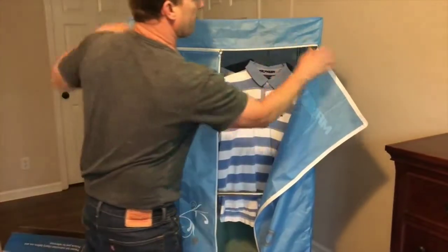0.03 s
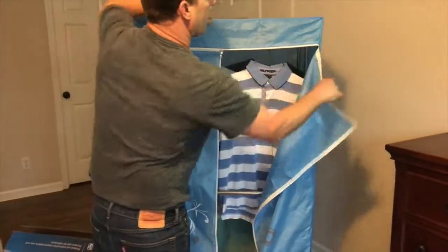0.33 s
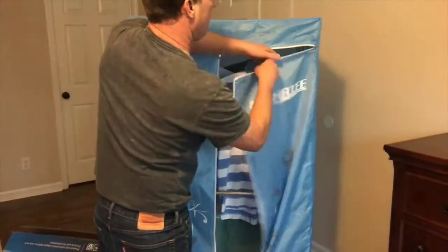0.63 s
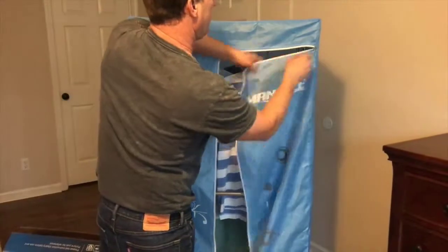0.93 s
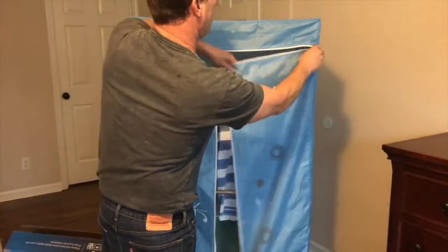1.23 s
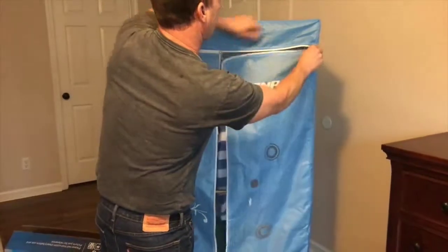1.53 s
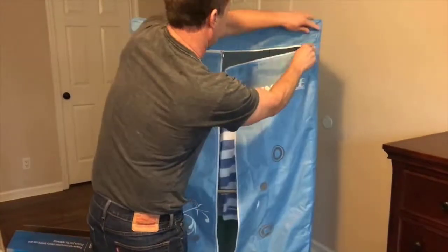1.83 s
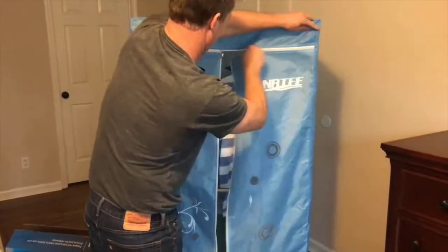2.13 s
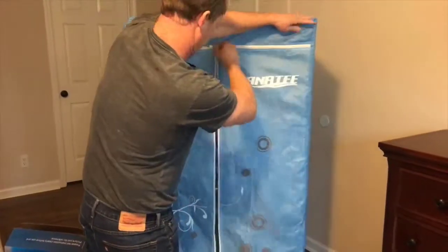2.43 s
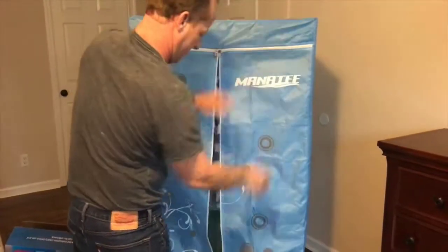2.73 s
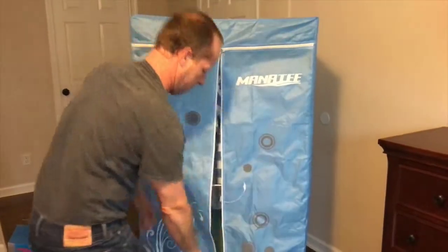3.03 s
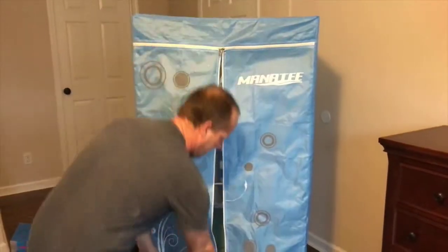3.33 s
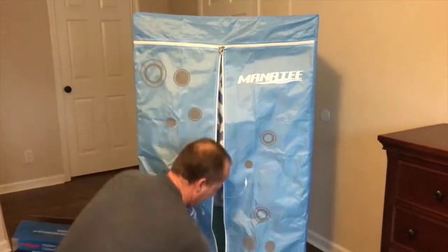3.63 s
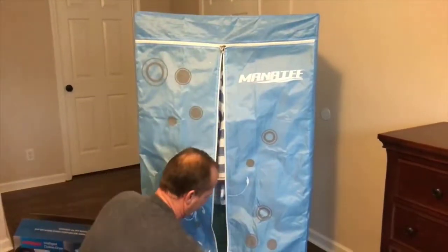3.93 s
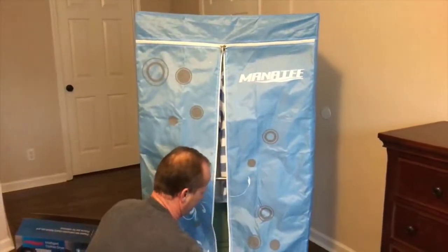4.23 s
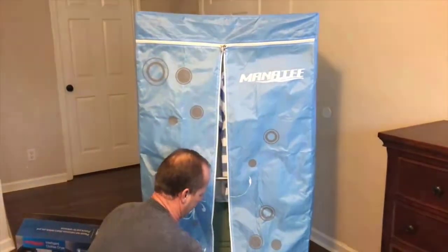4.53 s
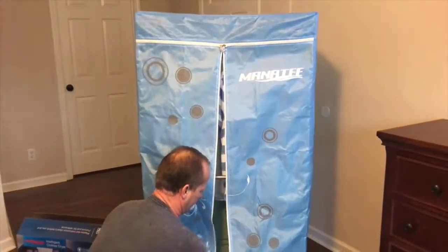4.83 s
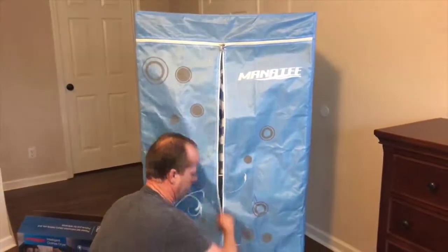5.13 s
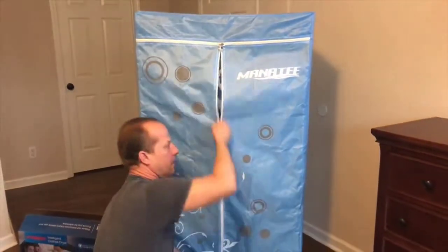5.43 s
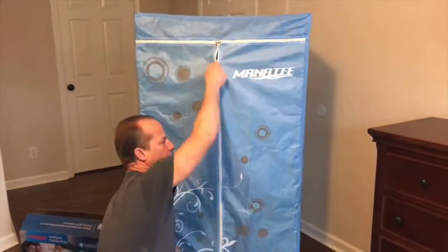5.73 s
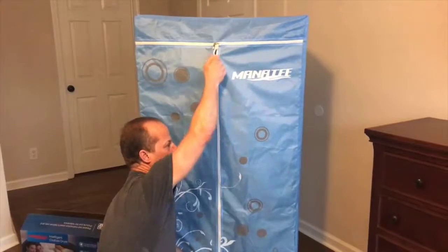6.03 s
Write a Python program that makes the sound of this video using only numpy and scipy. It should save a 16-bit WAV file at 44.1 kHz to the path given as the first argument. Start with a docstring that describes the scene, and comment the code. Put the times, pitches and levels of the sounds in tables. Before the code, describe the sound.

From the start, a nylon wardrobe cover crumples and swishes as its flap is swung over, with several crisp snaps, the strongest at about 1.1 seconds. From 1.8 to 2.7 seconds a zipper closes with a rasping buzz that rises in pitch, then slows. Its metal tab jingles and clinks lightly between 2.5 and 3 seconds. Two dull footfalls thud on the floor at about 2.8 and 3.4 seconds. Faint rustling and small fabric crackles continue until 4.8 seconds. From 4.9 to 6 seconds a second zipper is pulled in one long stroke, faster and higher, pressing harder near 5.7 seconds before dropping in pitch and stopping. Quiet room air and a faint low rumble of movement lie underneath. The place is a small bedroom, heard in mono from far enough away that the zips and cloth carry a short room reverberation.

```python
"""A small bedroom, one mono microphone, far enough off that zips and cloth are about half wall sound.
A man swings over the flap of a nylon wardrobe cover, which crumples, swishes and snaps. He zips the top
edge: the slider ticks over the teeth and the taut cloth radiates the buzz. The metal pull tab clinks,
and he steps back with two dull footfalls that ring the floor. He feels for the lower slider and pulls
it up in one long stroke. Room air lies under it all, with a low rumble as man and frame sway."""
import sys
import numpy as np
from scipy import signal
from scipy.fft import rfft, irfft
from scipy.io import wavfile

SR = 44100
rng = np.random.default_rng(int(sys.argv[2]) if len(sys.argv) > 2 else 0)


def file_out(sig):
    """Save sig as 16-bit WAV at sys.argv[1]."""
    # one column per channel
    cols = np.atleast_2d(sig).T
    # limit, then scale
    lim = np.clip(cols, -1, 1)
    pcm = np.round(lim * 32767).astype(np.int16)
    wavfile.write(sys.argv[1], SR, pcm)


N = 268613
TIME = np.arange(N) / SR

# The pull along each seam. Each row: time in seconds, teeth per second, relative force in dB.
TOP_STROKE = [(1.81, 91.4, -51), (1.95, 219.5, -45), (2.02, 340, -44), (2.08, 492.1, -43.5),
              (2.2, 585, -43), (2.27, 568.5, -42.5), (2.35, 594, -47.5), (2.39, 354.4, -37.5),
              (2.44, 379.5, -49.5), (2.5, 269.6, -50), (2.68, 90.05, -48.5)]
FRONT_STROKE = [(4.88, 199.8, -47.5), (4.935, 331.4, -45.5), (4.968, 600, -44.5), (5.0, 635, -46),
                (5.08, 600, -44.5), (5.21, 914.4, -42.5), (5.3, 987.8, -44), (5.4, 990.6, -43.5),
                (5.5, 841.5, -42), (5.58, 870.6, -42), (5.635, 836.7, -46.5), (5.67, 772.2, -39.5),
                (5.73, 600, -37), (5.8, 344.3, -38), (5.86, 250.6, -40), (6.06, 89.64, -43)]
# The partials of each seam's whine. Each row: multiple of the tooth rate, relative level in dB.
TOP_PARTIALS = [(1, -2), (2, -7), (3, -14.5), (4, -14.5), (6, -14.5)]
FRONT_PARTIALS = [(1, -4.5), (1.5, -20.5), (2, -6.5), (3, -8.5), (4, -13), (6, -18)]
# How readily the taut cloth along each seam sings. Each row: frequency in Hz, gain in dB.
TOP_SINGING = [(150, -23), (250, -13), (350, -4), (490, -4.5), (600, -0.5), (690, -0.5), (850, -4),
               (1170, 2.5), (1700, 2), (2300, 4), (6000, -3)]
FRONT_SINGING = [(130, -23), (215, -10), (330, -1.5), (450, -6), (560, -4.5), (660, -0.5), (780, -3),
                 (880, 1.5), (1000, -3), (1230, 7), (1500, 0.5), (2000, -2.5), (3000, -4), (6000, -6.5)]
# The knocked cloth panel and the scraping slider. Each row: frequency in Hz, relative level in dB.
PANEL_SPECTRUM = [(60, -40), (170, -8), (300, 1.5), (450, -8.5), (800, -1), (1200, 1.5), (1900, -2),
                  (3000, -8.5), (4500, -10.5), (7000, -32), (15000, -29)]
SCRAPE_SPECTRUM = [(500, -38.5), (2000, 11), (4200, 4.5), (6400, 2), (7600, -3.5), (9300, -3.5),
                   (10400, -9), (11500, -6.5), (15500, -7)]
# Hands on the cover: swinging the flap, drawing it along the top, letting go, straightening the seam.
# Each row: start, length and swell in seconds, then relative crumple and swish levels in dB.
CLOTH_MOVES = [(0.0, 0.11, .01, -67, -75.5), (0.231, 0.57, 0.008, -54, -63), (0.331, 0.03, 0.012, -45, -73),
               (0.517, 0.023, .005, -51.5, -79), (0.713, 0.063, 0.061, -54.5, -77),
               (0.878, 0.1, .03, -60.5, -61.5), (1.035, 0.14, 0.04, -53.5, -50.5),
               (1.243, 0.035, .02, -52.5, -68), (1.373, .04, .01, -59.5, -70),
               (1.442, 0.081, .005, -58, -76), (2.718, 1.1, .03, -73, -72), (3.007, 0.034, .005, -67, -67),
               (3.808, 1.01, 0.011, -67, -72), (4.2, 0.33, 0.048, -72, -68)]
# Nylon buckling and nylon sliding. Each row: frequency in Hz, relative level in dB.
CRUMPLE_SPECTRUM = [(60, -42.5), (200, -4.5), (500, -7.5), (900, -2.5), (1500, -1), (2600, -3.5),
                    (4200, -10.5), (7000, -21.5), (15000, -34.5)]
SWISH_SPECTRUM = [(600, -8.5), (2500, 4), (4200, 3.5), (6400, 2), (7600, -2.5), (9300, -1), (10400, -5.5),
                  (11500, -0.5), (15500, -6)]
# Folds snapping over; the row at 3.015 s is the low body of the pull tab's tick. Each row: start in seconds,
# peak at the cloth in dB, bass and treble trims in dB.
FOLD_SNAPS = [(0.196, -47, -12, -17), (0.237, -41.5, -33, -21), (0.509, -34.5, -30, -24),
              (0.739, -36, -14, -1.5), (0.789, -40, -12, -9), (1.142, -28, -14, -15),
              (1.448, -36, -43, -10), (1.78, -57, -13, -18), (1.809, -42, -4.5, -3), (3.015, -42, -25, -11),
              (3.82, -47.5, -23, -23), (3.899, -43, -14, -17), (4.047, -45, -38, -2), (4.092, -50, -3, -9),
              (4.306, -44, -18, -15), (4.449, -43, -13, -7.5), (4.63, -44, -12, -8)]
# The pull tab striking the slider. Each row: start in seconds, peak in dB, 60 dB decay time in seconds.
TAB_CLINKS = [(2.608, -36, 0.033), (2.617, -38, 0.03), (2.752, -52, 0.03), (2.894, -49, 0.015),
              (2.9495, -48, .006), (3.017, -34.5, 0.0032)]
# The tab ringing as it swings. Each row: start in seconds, pitch in Hz, relative level in dB.
TAB_JINGLES = [(2.46, 8350, -62), (2.54, 8350, -57), (2.599, 8350, -58), (2.73, 8500, -69),
               (2.828, 8500, -65)]
# Footfalls and lighter shifts of weight. Each row: start in seconds, relative level in dB.
STEPS = [(2.832, -30), (3.191, -54), (3.401, -27), (4.65, -55), (4.75, -56), (4.88, -45.5)]
# The floor's modes. Each row: frequency in Hz, relative level in dB, 60 dB decay time in seconds.
FLOOR_MODES = [(65, -17, 0.62), (123.7, -18.5, 0.44), (149, -7, 0.4), (184.5, -3, 0.29), (210.7, 5, .28),
               (256, -21, 0.51), (285.7, -0.5, 0.23), (311.4, 1, 0.34), (342, -12, 0.5), (410, -33, 0.17),
               (706, -14.5, 0.06), (857, -21.5, 0.16)]
# Near walls returning each thud to the microphone. Each row: delay in seconds, linear gain.
THUD_ECHOES = [(.0072, 0.36), (.0305, 0.35), (0.038, 0.28)]
# The bedroom's reverberation. Each row: frequency in Hz, 60 dB decay time in seconds.
WALLS_T60 = [(150, 0.37), (600, 0.54), (2000, 0.53), (5000, 0.58), (14000, 0.42)]
# The man and the light frame swaying. Each row: start and length in seconds, relative level in dB.
SWAYS = [(0.0, .15, -66), (0.334, 0.052, -61.5), (0.48, 0.31, -70), (1.89, 0.052, -60), (2.0, 0.31, -69.5),
         (2.377, 0.043, -55), (2.863, 0.69, -64), (4.95, 1.08, -66)]
# The rumble of that swaying, and the still room. Each row: frequency in Hz, relative level in dB.
RUMBLE_SPECTRUM = [(22, -37), (42, -7), (65, 0.5), (90, 3), (130, -6), (300, -13.5), (600, -22.5),
                   (3000, -69)]
AIR_SPECTRUM = [(15, -60), (25, -7), (75, 1), (128, -5), (163, -3.5), (475, -13), (927, -13), (2560, -16),
                (2780, -37), (3440, -16), (4870, -27.5), (5720, -28), (15000, -30)]


def zipper(stroke, partials, singing, jitter_teeth, scatter_db, rasp_db, whine_db, scrape_db, sizzle_db):
    """Each tooth knocks the panel and scrapes through the slider; the taut cloth sings at that rate."""
    times, tooth_hz, force_db = np.transpose(stroke)
    rate = np.interp(TIME, times, tooth_hz) * (1 + 0.02 * wander(90))
    travel = np.cumsum(rate) / SR  # teeth passed
    octaves = np.log2(rate / 600)  # a faster slider is louder
    easy_pull_db = -43.5  # any harder pull loads the slider
    load_db = np.maximum(np.interp(TIME, times, force_db) - easy_pull_db, 0)
    # Teeth are not quite evenly set, so their knocks blur into a rasp.
    offset, scatter = rng.standard_normal((4096, 2))[:int(travel[-1])].T
    tooth = np.arange(len(offset))
    arrival = np.interp(tooth + jitter_teeth * offset, travel[:-2], np.arange(N - 2))
    size = unit(amp(scatter_db * scatter - (-1) ** tooth))  # left and right tape in turn
    index, fraction = arrival.astype(int), arrival % 1
    knocks = np.bincount(index, size * (1 - fraction), N) + np.bincount(index + 1, size * fraction, N)
    knocks = (knocks - np.mean(size) * rate / SR) * np.sqrt(SR / rate)  # zero mean, even power
    rub = unit(np.exp(-2 * (travel % 1)) * grains(14000, spread_db=1))
    rasp = colour(knocks + 0.34 * rub, PANEL_SPECTRUM) * amp(rasp_db + 3 * octaves + 0.26 * load_db)
    # The small metal slider sizzles at the very top.
    metal = [(hz, db + sizzle_db * (hz > 11000)) for hz, db in SCRAPE_SPECTRUM]
    scrape = colour(rub, metal) * amp(scrape_db + 3.5 * octaves)
    # The slider rocks once per tooth and whines; load feeds the fundamental and weakens the overtones.
    whine = np.zeros(N)
    for multiple, db in partials:
        phase = 2 * np.pi * multiple * travel + 0.33 * wander(260)
        singing_db = on_log_axis(singing, multiple * rate)
        strain_db = load_db * (0.63 if multiple == 1 else -0.88)
        whine += np.sin(phase) * amp(db + singing_db + strain_db + 3 * wander(45))
    whine *= np.sqrt(2) * amp(whine_db + 3.5 * octaves)
    drag = amp(1.6 * wander(110))  # the tape bunches ahead of the slider
    return gain_curve(times, force_db) * drag * (rasp + scrape + whine)


def cloth(release_s=0.025):
    """Nylon buckles in small creases and hisses where it slides over itself."""
    start, length, swell, crumple_db, swish_db = np.transpose(CLOTH_MOVES)
    creases = grains(2500, spread_db=3.5)
    fibres = unit(grains(12000, spread_db=4.7) + 0.71 * creases)
    buckling = movements(zip(start, length, swell, crumple_db - 2), release_s)
    sliding = movements(zip(start, length, swell, swish_db + 1), release_s)
    flutter = amp(2 * wander(45))
    return (colour(creases, CRUMPLE_SPECTRUM) * buckling + colour(fibres, SWISH_SPECTRUM) * sliding) * flutter


def fold_snaps(attack_s=0.0012, t60=0.032):
    """A large fold flips over in a short burst of crackle; a taut panel adds a low pop."""
    out, t = np.zeros(N), TIME[:SR // 8]
    for start, peak_db, bass_db, treble_db in FOLD_SNAPS:
        crackle = rng.standard_normal(len(t)) * decay(t, t60) * (1 - np.exp(-t / attack_s))
        spectrum = [(70, bass_db - 19), (300, bass_db + 16.5), (700, bass_db + 12), (1400, 1),
                    (3800, -3.4), (7000, treble_db - 6.5), (15000, treble_db - 17)]
        add(out, start, with_peak(colour(crackle, spectrum), peak_db))
    return out


def pull_tab(ring_t60=0.39, split_hz=130):
    """The metal tab drops against the slider in bright ticks and rings on a close pair of modes."""
    out, t = np.zeros(N), TIME[:SR // 3]
    tick_spectrum = [(500, -2), (2500, -21), (7000, -5), (12000, 0), (15500, 3)]
    for start, peak_db, t60 in TAB_CLINKS:
        tick = colour(rng.standard_normal(len(t)) * decay(t, t60), tick_spectrum)
        add(out, start, with_peak(tick, peak_db))
    for start, hz, db in TAB_JINGLES:
        phase = 2 * np.pi * hz * t + 1.1 * wander(400)[:len(t)]
        pair = 0.5 * np.sin(phase) + 0.25 * np.sin(phase + 2 * np.pi * split_hz * t)
        chatter = amp(5.5 * wander(250)[:len(t)])  # the tab hangs loose while it rings
        add(out, start, pair * chatter * decay(t, ring_t60) * amp(db))
    return out


def footfalls(contact_s=0.0042, scuff_t60=0.61):
    """A soft heel rings the floor; the sole scuffs and the near walls return the thud."""
    out, t = np.zeros(N), TIME[:SR // 2]
    ring = sum(amp(db) * decay(t, t60) * np.sin(2 * np.pi * hz * t) for hz, db, t60 in FLOOR_MODES)
    ring *= 1 - np.exp(-t / contact_s)
    sole_spectrum = [(100, -9), (900, 12), (2600, 3), (6000, -19), (15000, -27)]
    for start, db in STEPS:
        scuff = colour(rng.standard_normal(len(t)), sole_spectrum) * decay(t, scuff_t60) * amp(db - 30)
        thud = with_peak(ring, db - 2.5)
        add(out, start, thud + scuff)
        for delay_s, gain in THUD_ECHOES:
            add(out, start + delay_s, gain * thud)
    return out


def bedroom(direct, wet_db, crossfade_hz=7, first_echo_s=0.004):
    """The direct sound reaches the microphone, then a diffuse tail from the walls."""
    t = TIME[:32768]
    hz = np.fft.rfftfreq(len(t), 1 / SR)
    noise = rfft(rng.standard_normal((2, len(t))))
    edges = np.r_[0, np.geomspace(150, SR / 2, 9)]
    tails = np.zeros((2, len(t)))
    for low, high in zip(edges, edges[1:]):
        band = irfft(noise * (hz >= low) * (hz < high))
        tails += band * decay(t, on_log_axis(WALLS_T60, (low + high) / 2)) * (t > first_echo_s)
    first, second = (signal.fftconvolve(direct, unit(tail) / np.sqrt(len(t)))[:N] for tail in tails)
    # A steady crossfade between two reflection patterns makes the tail ring less.
    turn = 2 * np.pi * crossfade_hz * TIME
    walls = first * np.cos(turn) + second * np.sin(turn)
    return (direct + amp(wet_db) * walls) / np.hypot(1, amp(wet_db))


def background(air_db=-68.5, swell_s=0.016):
    """Still room air at the microphone, and a low rumble as the man and the frame shift."""
    air = colour(rng.standard_normal(N), AIR_SPECTRUM) * amp(air_db)
    sway = movements([(start, length, swell_s, db - 2) for start, length, db in SWAYS], release_s=0.032)
    return air + colour(rng.standard_normal(N), RUMBLE_SPECTRUM) * sway


def amp(db):
    """Decibels to gain."""
    return 10 ** (np.asarray(db) / 20)


def unit(x):
    """Scale to rms 1."""
    return x / np.sqrt(np.mean(x ** 2))


def with_peak(x, db):
    """Scale to a peak level in dB."""
    return x / np.abs(x).max() * amp(db)


def on_log_axis(points, hz):
    """Read (Hz, value) points on a log-frequency axis."""
    point_hz, value = np.transpose(points)
    return np.interp(np.log(np.maximum(hz, 1)), np.log(point_hz), value)


def colour(x, spectrum, size=4096):
    """Minimum-phase filter through (Hz, dB) points; white noise keeps its power."""
    gain = unit(amp(on_log_axis(spectrum, np.fft.rfftfreq(size, 1 / SR))))
    cepstrum = irfft(np.log(gain))
    cepstrum[1:size // 2] *= 2
    cepstrum[size // 2 + 1:] = 0
    return signal.fftconvolve(x, irfft(np.exp(rfft(cepstrum))))[:len(x)]


def gain_curve(times, db, fade_s=0.027):
    """Gain that follows a dB curve and fades just outside it."""
    outside = np.maximum(times[0] - TIME, 0) + np.maximum(TIME - times[-1], 0)
    return amp(np.interp(TIME, times, db)) * np.exp(-outside / fade_s)


def movements(rows, release_s):
    """Joint gain of movements that swell, hold and die away; their powers add."""
    power = np.zeros(N)
    for start, length, swell_s, db in rows:
        before, after = np.maximum(start - TIME, 0), np.maximum(TIME - start - length, 0)
        power += (amp(db) * np.exp(-before / swell_s - after / release_s)) ** 2
    return np.sqrt(power)


def decay(t, t60):
    """Fall by 60 dB in t60 seconds."""
    return np.exp(-np.log(1000) * t / t60)


def wander(rate_hz):
    """Random drift with a spread near 1."""
    knots = rng.standard_normal(8192)
    return 1.2 * np.interp(TIME * rate_hz, np.arange(len(knots)), knots)


def grains(per_second, spread_db):
    """Random tiny clicks of unequal size, rms 1."""
    where = np.flatnonzero(rng.random(N) < per_second / SR)
    sizes = amp(spread_db * np.minimum(rng.exponential(size=len(where)), 4))
    return unit(np.bincount(where, sizes * rng.choice([-1, 1], len(where)), N))


def add(out, start_s, sound):
    """Mix a sound in at its start time."""
    start = int(start_s * SR)
    out[start:start + len(sound)] += sound[:len(out) - start]


def scene():
    """Zips and cloth sound through the bedroom; tab, feet and air join them, alike in both channels."""
    top = zipper(TOP_STROKE, TOP_PARTIALS, TOP_SINGING, jitter_teeth=0.125, scatter_db=1.5,
                 rasp_db=-3.5, whine_db=-1, scrape_db=-5, sizzle_db=0)
    front = zipper(FRONT_STROKE, FRONT_PARTIALS, FRONT_SINGING, jitter_teeth=0.129, scatter_db=3,
                   rasp_db=-5.5, whine_db=0, scrape_db=-8, sizzle_db=3)
    zips = bedroom(top + front, wet_db=0)
    handling = bedroom(cloth() + fold_snaps(), wet_db=-0.5)
    return np.tile(zips + handling + pull_tab() + footfalls() + background(), (2, 1))


def record(dry):
    """The recorder drops the deepest bass and cuts off the highest treble steeply."""
    low_cut = signal.butter(4, 34, "high", fs=SR, output="sos")
    high_cut = signal.ellip(10, 0.2, 60, 15750, fs=SR, output="sos")
    return signal.sosfilt(high_cut, signal.sosfilt(low_cut, dry))


dry = scene()
out = record(dry)
file_out(out)
```